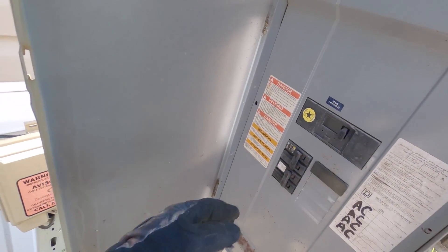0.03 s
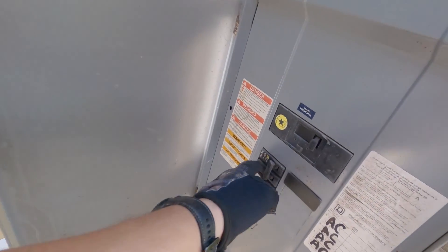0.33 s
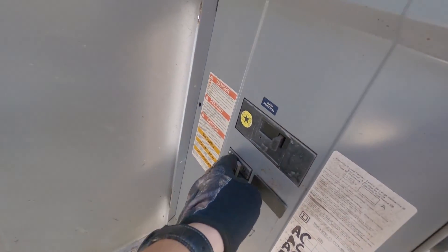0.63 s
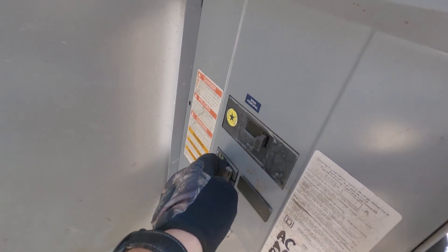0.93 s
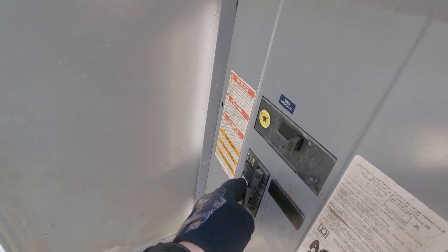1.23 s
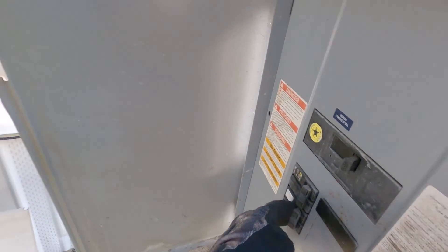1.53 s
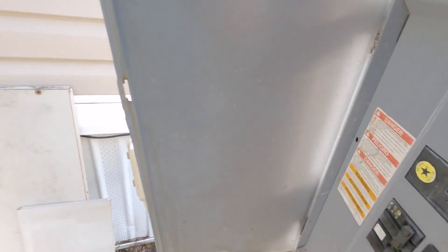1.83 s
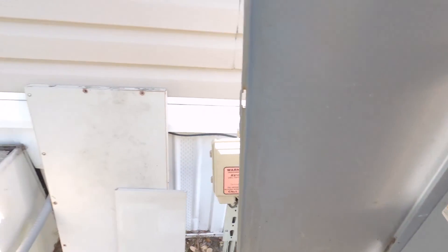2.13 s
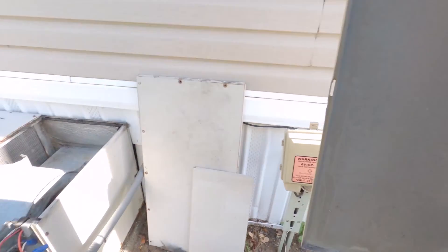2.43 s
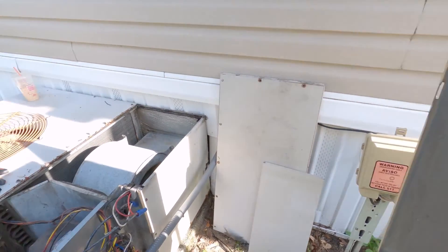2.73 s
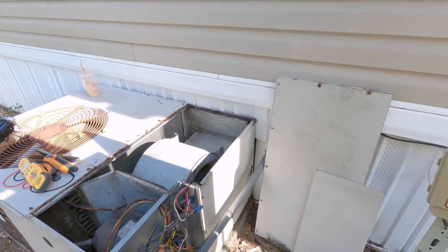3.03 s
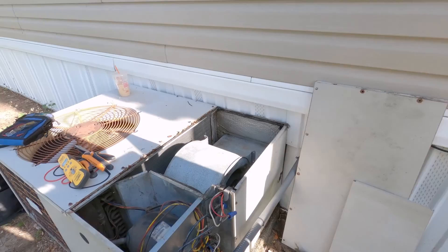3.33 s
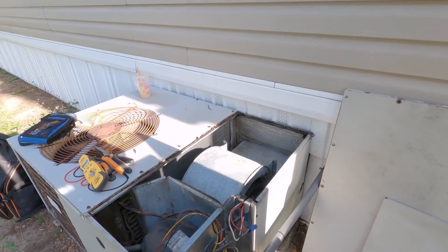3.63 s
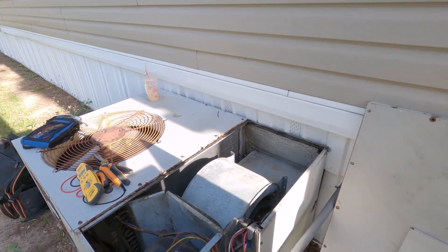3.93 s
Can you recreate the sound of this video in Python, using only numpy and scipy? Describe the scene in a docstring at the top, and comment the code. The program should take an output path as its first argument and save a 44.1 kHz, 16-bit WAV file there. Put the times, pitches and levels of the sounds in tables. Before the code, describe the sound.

An outdoor air conditioner starts humming and buzzing after a breaker snaps on.

```python
"""Beside a house, close to a steel breaker box, over outdoor rumble: a gloved hand bumps the box.
At 0.86 s the breaker snaps on and the steel rings; at 1.45 s the air conditioner's contactor clacks in.
From 1.5 s the compressor hums, buzzes and knocks its cabinet once per turn while the fan gathers speed.
Around 2.3 s the stereo microphone swings out from behind the box door to face the unit,
and different cabinet panels stand out in turn."""
import sys
import numpy as np
from scipy import signal
from scipy.fft import rfft, irfft
from scipy.io import wavfile

SR = 44100
rng = np.random.default_rng(int(sys.argv[2]) if len(sys.argv) > 2 else 0)


def master(y):
    """Save y as 16-bit WAV."""
    cut = np.clip(np.atleast_2d(y).T, -1, 1)
    pcm = np.round(cut * 32767)  # scale
    wavfile.write(sys.argv[1], SR, pcm.astype(np.int16))


N = 176400
T = np.arange(N) / SR
HZ = np.fft.rfftfreq(N, 1 / SR)
START_S = 1.5  # compressor and fan start together
SHAFT_HZ = 58.95


def amp(db):
    """Decibels to gain."""
    return 10 ** (np.asarray(db) / 20)


def unit(x):
    """Scales to rms 1."""
    return x / np.sqrt(np.mean(x ** 2) + 1e-20)


def read(points, hz):
    """Reads a spectrum on a log-frequency axis."""
    f, value = np.transpose(points)
    return np.interp(np.log(hz + 1), np.log(f), value)


def curve(rows, column=1):
    """Reads one column of a control curve at every sample."""
    rows = np.array(rows)
    return np.interp(T, rows[:, 0], rows[:, column])


def drift(cutoff_hz):
    """Slow random wander of rms about 1."""
    f = np.fft.rfftfreq(1024, 1 / 128)
    slow = unit(irfft(rfft(rng.standard_normal(1024)) / (1 + (f / cutoff_hz) ** 4)))
    return np.interp(T, np.arange(1024) / 128, slow)


def between(start, end, fade):
    """A gate with soft edges."""
    return (1 + np.tanh(2 * (T - start) / fade)) * (1 - np.tanh(2 * (T - end) / fade)) / 4


def decay(start, t60):
    """Sudden onset and exponential decay."""
    return (T >= start) * np.exp(-np.log(1000) * np.maximum(T - start, 0) / t60)


def rise(start, time_constant):
    """Exponential approach from 0 to 1."""
    return 1 - np.exp(-np.maximum(T - start, 0) / time_constant)


def treble_share(hz, corner_hz=4860):
    """The share of a frequency that counts as treble, whose level changes along the microphone's path."""
    return hz ** 2 / (hz ** 2 + corner_hz ** 2)


# likeness of the two microphones: f/Hz, correlation (capped at 1)
MIC_LIKENESS = [(60,.99),(250,.97),(500,0.85),(1000,0.8),(2500,1.2),(5000,0.3),(9000,0.04)]

def pair(a, b, hz):
    """Blends two unrelated signals into left and right, less alike in the treble."""
    same = np.clip(read(MIC_LIKENESS, hz), -1, 1)
    mid, side = np.sqrt((1 + same) / 2) * a, np.sqrt((1 - same) / 2) * b
    return np.array([mid + side, mid - side])


def noise(colour):
    """Stereo noise of rms 1 with the given spectrum."""
    a, b = rfft(rng.standard_normal((2, N)))
    return unit(irfft(pair(a, b, HZ) * amp(read(colour, HZ)) * np.minimum(HZ / 20, 1), N))


# hum along the microphone's path: t/s, relative level/dB
HUM_LEVEL = [(1.55, -30), (1.62, -32), (1.75, -44), (1.84, -28), (2.16, -28), (2.27, -22.5), (2.46, -22.5),
             (2.52, -29.5), (2.91, -21.5), (3.0, -28.5), (3.25, -21), (3.49, -27), (3.96, -22.5),
             (4.0, -26)]

def compressor():
    """One shaft drives hum, buzz, rattle and panels; only the hum bends freely around the box door."""
    speed_hz = SHAFT_HZ * rise(START_S, 0.06) * (1 + 0.0005 * drift(4))
    turns = np.cumsum(speed_hz) / SR + SHAFT_HZ * 12e-6 * drift(40)  # jitter blurs the highest orders
    hum = np.sqrt(2) * amp(curve(HUM_LEVEL) + 1.1) * np.sin(2 * np.pi * 2 * turns)
    cabinet = reflected(buzz(turns) + rattle(turns)) + panels(turns)
    lean_db = 5.5 * between(1.3, 2.3, fade=0.54)  # the door shades the right microphone
    fade_in = np.clip((T - START_S) / 0.09, 0, 1)
    return fade_in * (hum + amp([lean_db / 2, -lean_db / 2]) * cabinet)


# buzz and rattle along the microphone's path: t/s, level/dB, treble/dB
BUZZ_AT_MIC = [(1.5,0,2),(1.6,-2.5,-10),(1.85,-5,-8.5),(2.05,1,-5),(2.26,0.5,-4),(2.37,1.5,0),(2.53,0.5,1.5),(2.68,0,-2.5),(2.9,-1.5,6),(3.22,-3.5,3.5),(3.48,-2.5,4.5),(4,-7.5,9.5)]
# spectrum of the shaft orders: f/Hz, level/dB
BUZZ_COLOUR = [(59,-47),(180,-64),(350,-40),(700,-47.5),(1000,-48),(1500,-54.5),(2700,-49),(3600,-55),(4300,-53.5),(5100,-52.5),(5800,-66.5),(7500,-63),(9500,-66),(13000,-83)]

def buzz(turns, waver_db=3.5):
    """Shaft orders, each wavering by itself as the microphone moves through the sound field."""
    level_db, treble_db = curve(BUZZ_AT_MIC), curve(BUZZ_AT_MIC, column=2)
    step, wave = np.exp(2j * np.pi * turns), np.ones(N, complex)
    out = np.zeros((2, N))
    for order in range(1, 180):
        hz, wave = order * SHAFT_HZ, wave * step
        if order == 2:  # the hum has its own level
            continue
        db = read(BUZZ_COLOUR, hz) + level_db + treble_db * treble_share(hz)
        db += waver_db * hz / (hz + 750) * drift(1.8)
        mics = pair(1, 1j * rng.choice([-1, 1]), hz) * np.exp(2j * np.pi * rng.random())
        out += amp(db) * (mics[:, None] * wave).real
    return out


# cabinet panels as the microphone passes them: f/Hz, width/Hz, level/dB, from/s, until/s, swell/dB
CABINET_PANELS = [(239,20,-36,3.25,4.2,3.5),(360,27,-38.5,2.28,4.5,1.5),(411,15,-44,2.3,2.85,4),(466,22,-36.5,2.06,2.91,5.5),(1014,45,-32.5,2.016,2.34,-2),(1125,23,-36.5,2.4,2.89,4.5),
                  (1230,36,-36.5,2.53,5.4,2),(1460,17,-47,2.9,4.6,4),(1588,67,-43,2.02,2.42,1),(1910,89,-49,1.98,2.6,1),(2090,36,-43,2.56,4.4,4),(2527,56,-42.5,2.62,4.2,9),
                  (2773,130,-47,2.16,2.82,4),(3680,430,-49.5,2.22,2.5,2),(4565,71,-51,2.75,4.2,-2),(5110,75,-46.5,3.02,3.27,9)]

def panels(turns):
    """One knock per turn rings each panel, lifting the few orders around its resonance."""
    out = np.zeros((2, N))
    for hz, width, db, start, end, swell_db in CABINET_PANELS:
        orders = round(hz / SHAFT_HZ) + np.arange(-3, 4)
        gains = 1 / (1 + 1j * (orders * SHAFT_HZ - hz) / width) ** 2
        gains *= np.exp(1j * hz / 7000 * rng.standard_normal(len(orders)))  # high panels: less in step
        own_turns = turns + 0.6 * rng.random()  # each is knocked at its own point of the turn
        ring = sum(gain * np.exp(2j * np.pi * k * own_turns) for k, gain in zip(orders, gains))
        mics = pair(0.97, 0.5j * rng.choice([-1, 1]), hz) * np.exp(2j * np.pi * rng.random())
        arch = np.sin(np.pi * np.clip((T - start) / (end - start), 0, 1)) - 0.5
        level = amp(db + swell_db * arch + 1.1 * drift(11)) * between(start, end, fade=0.15)
        out += np.sqrt(2) * level * (mics[:, None] * ring).real
    return out


# gas and rattle noise from the cabinet: f/Hz, relative density/dB
RATTLE_COLOUR = [(200,-1),(500,0),(700,-5),(1050,3),(1400,-5.5),(2600,-5),(4000,-6.5),(5100,-8.5),(5900,-14),(8700,-17),(9500,-13),(10300,-19.5),(11500,-20),(15000,-36)]
# knocking of the compressor as it takes up load: f/Hz, width/Hz, level/dB
STRAIN_BANDS = [(1106,68,-47),(1610,230,-40),(2090,890,-44)]

def rattle(turns, level_db=-35.5, pulse_depth=0.16):
    """Gas noise that swells once per turn, with a coarse knocking just after the start."""
    hiss = noise(RATTLE_COLOUR)
    treble = irfft(rfft(hiss) * treble_share(HZ), N)
    treble_gain = amp(curve(BUZZ_AT_MIC, column=2))
    running = amp(level_db + curve(BUZZ_AT_MIC)) * (hiss - treble + treble * treble_gain)
    grit = rfft(noise(RATTLE_COLOUR))
    strain = sum(amp(db) * unit(irfft(grit / (1 + 1j * (HZ - hz) / width) ** 2, N))
                 for hz, width, db in STRAIN_BANDS)
    pulse = unit(np.exp(pulse_depth * np.cos(2 * np.pi * (turns - 0.2))))
    return pulse * (running + strain * between(1.57, 1.91, fade=0.023))


# nearby wall, door and ground: delay as the unit starts/ms, slide/(ms per s)
REFLECTIONS = [(.9,.22),(1.9,-.35),(3.1,.5)]

def reflected(direct, gain=0.3):
    """Early reflections slide against the direct sound as the microphone moves, shifting the colour."""
    echoes = np.zeros((2, N))
    for ms, slide in REFLECTIONS:
        delay_s = (ms + slide * (T - START_S)) / 1000
        echoes += [np.interp(T - delay_s, T, side) for side in direct]
    return (direct + gain * echoes) / np.sqrt(1 + len(REFLECTIONS) * gain ** 2)


# fan air at full speed, from beside the unit: f/Hz, relative density/dB
FAN_COLOUR = [(25,-7),(60,7.5),(110,-4),(250,-5.5),(380,-7.5),(480,-11.5),(680,-17.5),(870,-11),(1400,-21),(3000,-26),(8000,-42),(15000,-46)]

def fan_air(full_speed_db=-20):
    """Air noise grows with a power of the blade speed."""
    speed = rise(START_S, 0.9)
    return amp(full_speed_db + drift(36)) * speed ** 4.7 * noise(FAN_COLOUR)


def fan_blades(full_speed_hz=386):
    """A faint, fluttering blade tone climbs as the fan spins up."""
    speed = rise(START_S, 0.47)
    passes = np.cumsum(full_speed_hz * speed * (1 + 0.0085 * drift(23))) / SR
    return amp(-37 + 5 * drift(7.4)) * speed ** 22 * np.sin(2 * np.pi * passes)


# blows of the breaker, then the contactor: t/s, level/dB, t60/s
SNAPS = [(0.8566,-9,0.018),(0.8615,-15,0.042),(1.4446,-20,0.027),(1.4479,-13.5,0.07),(1.468,-20.5,0.064)]
# spectrum of those blows: f/Hz, relative density/dB
SNAP_COLOUR = [(150,2),(500,-4),(900,-2.5),(1700,-5),(2400,-0.5),(3700,-1.5),(4800,-2),(6000,-8),(9000,-10.5),(12000,-22.5),(15000,-32)]
# glove on the lever, close by: t/s, level/dB
LEVER_TICKS = [(.18,-50.5),(0.69,-46.5),(.80,-49),(0.833,-42.5),(1.316,-47),(1.363,-51)]

def switches(attack_s=0.00065, tail_db=-22.5):
    """Breaker and contactor each strike in a quick cluster; the lever ticks under the glove."""
    snaps = sum(amp(db) * rise(start, attack_s) * (decay(start, t60) + amp(tail_db) * decay(start, 0.22))
                for start, db, t60 in SNAPS)
    ticks = sum(amp(db) * decay(start, t60=0.12) for start, db in LEVER_TICKS)
    tick_colour = [(300, 6), (3000, 3), (9000, -7), (15000, -35)]  # f/Hz, relative density/dB
    return snaps * noise(SNAP_COLOUR) + ticks * noise(tick_colour)


# contacts closing: t/s, level/dB
CONTACT_CRACKS = [(.8575,-15),(1.4498,-12)]

def contacts(hz=3700, t60=0.0012):
    """Each switch's contacts meet with one hard, very short click."""
    return sum(amp(db) * decay(start, t60) * np.sin(2 * np.pi * hz * (T - start))
               for start, db in CONTACT_CRACKS)


# blows that ring the steel: t/s, box modes/dB, sheet ring/dB, pitch factor
BOX_KNOCKS = [(0.8613,2,-24,0.97),(1.458,-3,-27,.93)]
# box modes, before each blow's pitch factor and level: f/Hz, level/dB, t60/s
BOX_MODES = [(189.2,-14,0.25),(227,-9,0.17),(245,-17,0.15),(313,-27,0.67),(369,-25,0.18),(511,-38,0.97),(602,-31,0.25),(1020,-28,0.087),(1664,-23,0.13),(1980,-34,.12),(3079,-36,0.15),(4107,-16,0.04)]

def steel_box(attack_s=0.0043):
    """Each switch thumps its steel enclosure and leaves the sheets ringing."""
    out = np.zeros((2, N))
    for start, modes_db, ring_db, pitch in BOX_KNOCKS:
        modes = sum(amp(db) * decay(start, t60) * np.sin(2 * np.pi * hz * pitch * (T - start))
                    for hz, db, t60 in BOX_MODES)
        ring = decay(start, t60=0.7) * sheet_ring()
        out += rise(start, attack_s) * (amp(modes_db) * modes + amp(ring_db) * ring)
    return out


# ring of the box's thin walls: f/Hz, relative level/dB
SHEET_COLOUR = [(300,4),(600,6.5),(850,-2.5),(1700,-2),(3000,-4),(4400,-7),(5200,-19.5),(9000,-38),(14000,-56)]

def sheet_ring(mode_count=330):
    """Many close modes of thin steel, at random pitches and phases."""
    bins = rng.integers(0, len(HZ) // 2, mode_count)
    a, b = np.zeros((2, len(HZ)), complex)
    a[bins], b[bins] = np.exp(2j * np.pi * rng.random((2, mode_count)))
    return unit(irfft(pair(a, b, HZ) * amp(read(SHEET_COLOUR, HZ)), N))


# hand on the box, near the microphone: t/s, length/s, level/dB
HAND_BUMPS = [(0.56,0.28,-42.5),(0.742,0.11,-36),(1.038,0.19,-32.5),(1.388,0.089,-33)]
# spectrum of the bumps: f/Hz, relative density/dB
BUMP_COLOUR = [(60,5.5),(160,-27),(220,3.5),(300,-5.5),(500,-14.5),(1500,-32),(6000,-69)]

def hand():
    """Dull bumps of the gloved hand on the box."""
    bumps = sum(amp(db) * np.exp(-(2 * (T - centre) / length) ** 2) for centre, length, db in HAND_BUMPS)
    return bumps * noise(BUMP_COLOUR)


# wind right on the microphone ports: f/Hz, relative density/dB
WIND_COLOUR = [(20,17),(60,-22),(120,0),(250,-14),(1000,-125)]

def wind(steady_db=-56.5, puff_db=-23.5, puff_s=1.685):
    """Low buffeting, unrelated at the two ports, with a puff on the left as the microphone swings."""
    puff = amp(puff_db) * np.exp(-(2 * (T - puff_s) / 0.28) ** 2)
    left = noise(WIND_COLOUR)[0] * (amp(steady_db) + puff)
    right = noise(WIND_COLOUR)[0] * amp(steady_db)
    return np.array([left, right])


# open air around the house: f/Hz, relative density/dB
OUTDOOR_COLOUR = [(12, -14), (20, -4), (70, -1.5), (135, -15), (217, -15), (242, -20.5), (278, -22.5),
                  (387, -36.5), (555, -30), (1080, -32.5), (1680, -37), (3970, -50), (15000, -74)]

def outdoors(level_db=-28.5):
    """Steady outdoor rumble and distant hiss."""
    return amp(level_db) * noise(OUTDOOR_COLOUR)


def scene():
    """The air conditioner and its switches, heard from the breaker box over the outdoor rumble."""
    air_conditioner = compressor() + fan_air() + fan_blades()
    return air_conditioner + outdoors() + wind() + hand() + switches() + contacts() + steel_box()


# balance of the microphone pair: f/Hz, left minus right/dB
MIC_BALANCE = [(60,1.7),(500,0.8),(1200,2),(4000,2.5),(8000,-0.5),(12000,-1)]
# phase between the microphones: f/Hz, lag of the left/rad
MIC_LAG = [(60,0.028),(250,0.15),(800,0.31),(2200,1),(4200,0.23),(9000,0.38)]

def record(dry, cutoff_hz=15100):
    """Balance and lag of the two microphones, then the band limit."""
    hz = np.fft.rfftfreq(2 * N, 1 / SR)
    tilt, lag = read(MIC_BALANCE, hz) / 2, read(MIC_LAG, hz) / 2
    response = amp([tilt, -tilt]) * np.exp(1j * np.array([-lag, lag]))
    heard = irfft(rfft(dry, 2 * N) * response)[:, :N]
    lowpass = signal.firwin(511, cutoff_hz, window=("kaiser", 9), fs=SR)
    return signal.oaconvolve(heard, lowpass[None], "same")


dry = scene()
out = record(dry)
master(out)
```